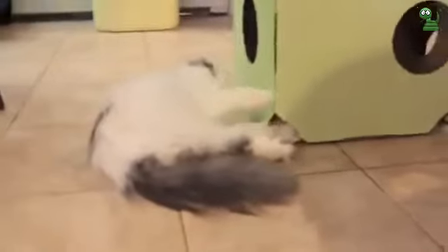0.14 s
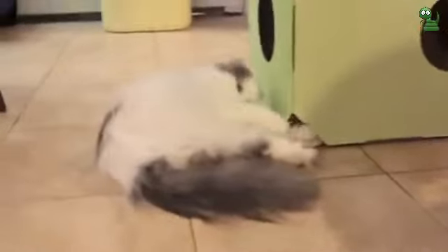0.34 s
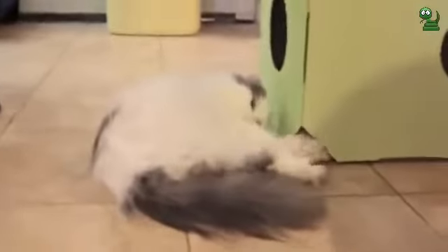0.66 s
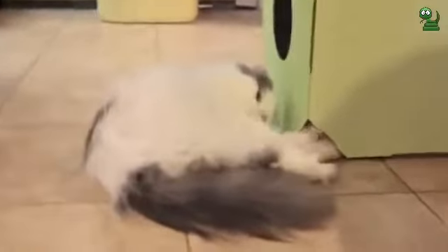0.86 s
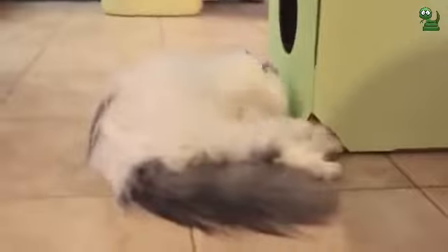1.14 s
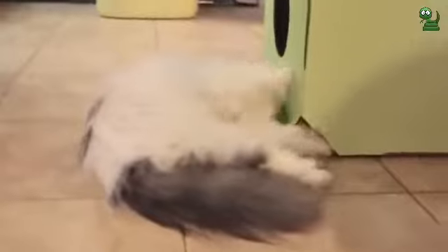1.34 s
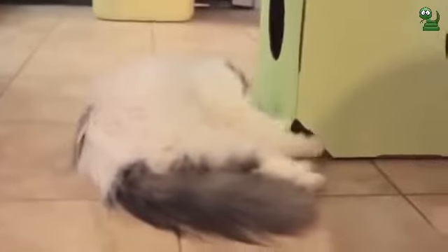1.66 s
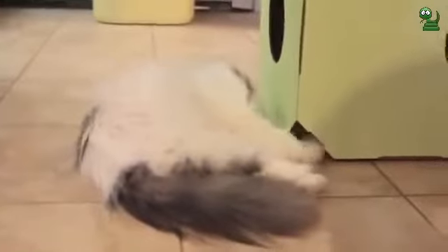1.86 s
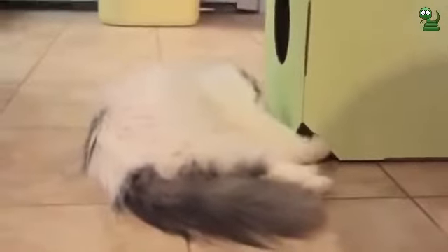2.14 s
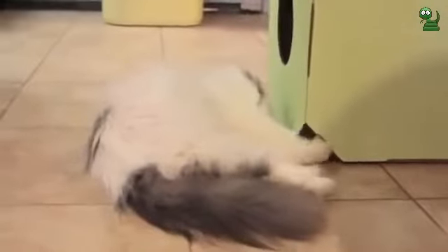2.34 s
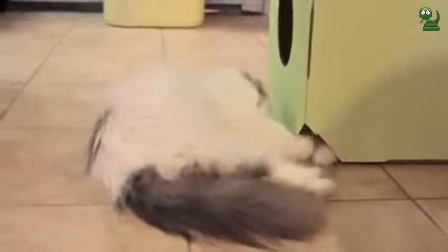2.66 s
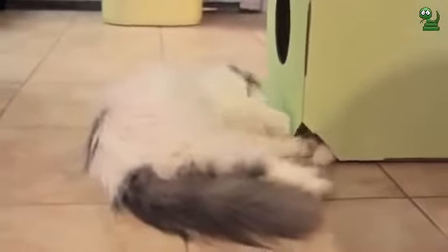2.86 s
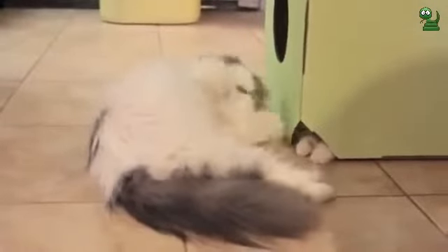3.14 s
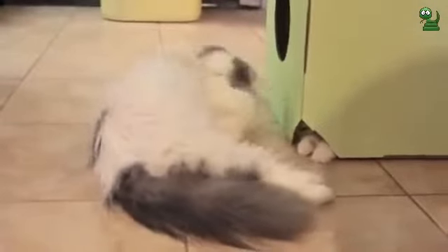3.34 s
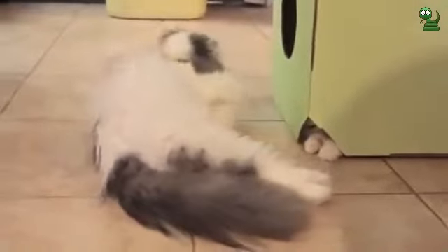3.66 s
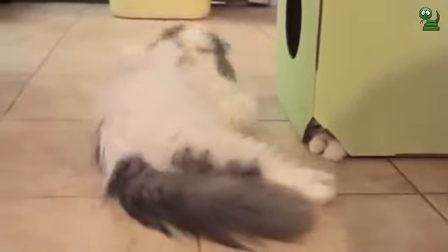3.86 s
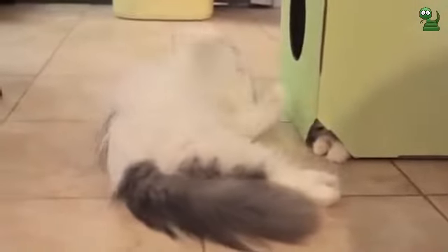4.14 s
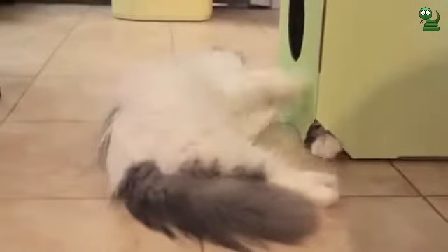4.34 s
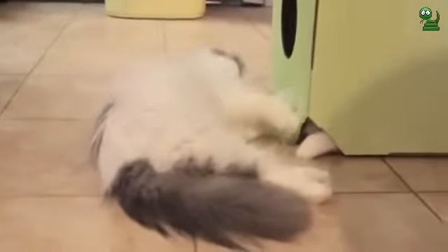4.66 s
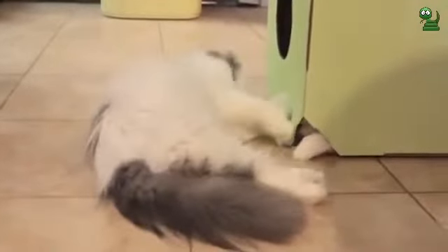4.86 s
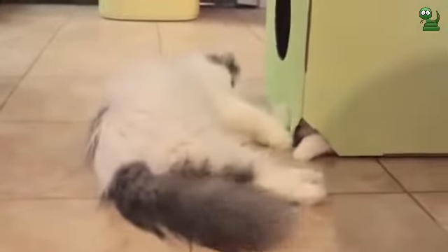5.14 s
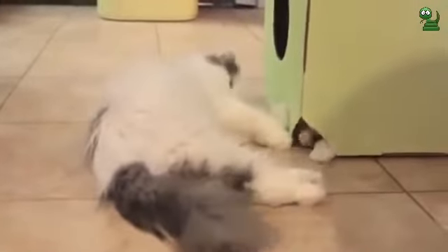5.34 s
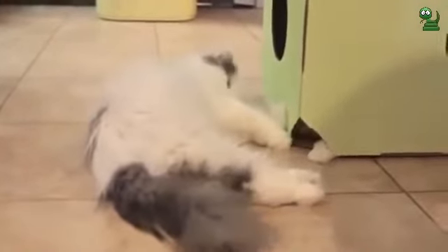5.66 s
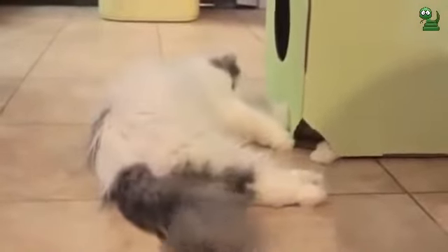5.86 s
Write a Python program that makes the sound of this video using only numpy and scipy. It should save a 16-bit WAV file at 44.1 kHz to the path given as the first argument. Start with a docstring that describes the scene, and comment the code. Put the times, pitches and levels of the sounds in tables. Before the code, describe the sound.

Irregular hollow thumps, brief scuffs and tiny clicks from a playing kitten in a small hard room, with one loud knock midway.

```python
"""A kitten paws at a hollow plastic pet house on a tile floor, a metre or two from a phone.
Blows ring damped wall modes; skids are random slips that scrape, shake the lower edge and hiss.
Claws tick as a snap and a short damped ring; fur and body rub as grainy filtered noise.
A small hard room answers with a noise tail, over appliance hum lines and steady room noise."""
import sys
import numpy as np
from scipy import signal
from scipy.fft import rfft, irfft
from scipy.io import wavfile
from scipy.ndimage import uniform_filter1d

SR = 44100
rng = np.random.default_rng(int(sys.argv[2]) if len(sys.argv) > 2 else 0)


def store_wav(level_fs):
    """Save 16-bit WAV to argv[1]."""
    pcm = np.round(np.clip(np.atleast_2d(level_fs), -1, 1) * 32767)
    wavfile.write(sys.argv[1], SR, pcm.T.astype(np.int16))


N = 264600


def undb(db):
    """Decibels to gain."""
    return 10 ** (np.asarray(db) / 20)


def level(x, db):
    """Scales to an rms level."""
    return x * undb(db) / np.sqrt(np.mean(x ** 2))


def band(x, hz, width_hz):
    """Two-pole resonance, gain 1 at the centre."""
    b, a = signal.iirpeak(min(hz, 0.4 * SR), hz / width_hz, fs=SR)
    return signal.lfilter(b, a, x)


def double_band(x, hz, width_hz):
    """Two resonances in series, the second twice as wide, for steeper skirts."""
    return band(band(x, hz, width_hz), hz, 2 * width_hz)


def add(out, start_s, piece):
    """Mixes a piece in at a time."""
    i = int(start_s * SR)
    out[i:i + len(piece)] += piece[:N - i]


def walk(rate_hz):
    """Random levels held 1 / rate_hz seconds and slewed twice; spread well under 1."""
    hold = int(SR / rate_hz)
    steps = np.repeat(rng.standard_normal(N // hold + 1), hold)
    return 0.91 * uniform_filter1d(uniform_filter1d(steps, hold), hold)[:N]


def fur():
    """Fine dense grains of hair catching, and a duller rub of the body, swelling as it moves."""
    # drag of fur over tile and plastic: time_s, hiss_db
    hair_levels = [(0.0, -59.5), (.08, -60), (.17, -67.5), (.33, -65), (.45, -55.5), (.62, -69.5),
                   (.75, -69.5), (1.0, -65), (1.3, -71.5), (1.62, -59.5), (1.85, -60.5), (2.1, -70),
                   (2.28, -65.5), (2.45, -67), (3.0, -65), (3.25, -72.5), (4.0, -68), (5.35, -70),
                   (5.52, -64), (5.7, -67), (6.0, -69)]
    # dull rub of the body: time_s, rub_db
    body_levels = [(0.0, -64.5), (.45, -56), (1.0, -61.5), (1.2, -64.5), (1.5, -53), (1.85, -66),
                   (3.3, -64), (3.5, -59), (3.7, -66), (6.0, -66)]
    hair_hz, hair_width_hz = 3980, 5800
    body_hz, body_width_hz = 1290, 1140
    t = np.arange(N) / SR
    grain_db = 1.5 * rng.exponential(size=N) + 0.3 * walk(20)
    hair, body = rng.standard_normal((2, N)) * undb(grain_db)
    hiss = level(band(hair, hair_hz, hair_width_hz), 0)
    rub = level(band(body, body_hz, body_width_hz), 0)
    hiss = hiss * undb(np.interp(t, *np.transpose(hair_levels)))
    return hiss + rub * undb(np.interp(t, *np.transpose(body_levels)))


def hum():
    """Each appliance line is partly a steady tone, partly narrow noise that makes it waver."""
    # hum lines: pitch_hz, width_hz, level_db
    lines = [(60.7, 12, -67), (102, 6, -78), (122.6, 9.8, -62), (195, 2.6, -50), (361.3, 1.2, -56),
             (393.7, 19, -59)]
    t, out = np.arange(N) / SR, 0
    for hz, width_hz, db in lines:
        noise = rng.standard_normal(N)
        waver = level(double_band(noise, hz, 2 * width_hz), 0)
        tone = np.sin(2 * np.pi * hz * t + rng.uniform(0, 2 * np.pi))
        out = out + level(tone + 0.2 * waver, db)
    return out


def room_noise():
    """Steady air and house noise with a fixed spectrum, swelling a little."""
    # relative spectrum: freq_hz, density_db (per Hz)
    spectrum = [(12, -44.5), (20, -23), (106, -4.5), (146, -11), (170, -1), (194, -6.5), (221, -1),
                (246, -11), (311, -2.5), (363, -5), (485, -11), (981, -14), (2650, -34), (8810, -56.5),
                (10300, -63), (13400, -66), (22000, -120)]
    rms_db, swell_db, swell_rate_hz = -52, 0.23, 0.7
    hz, db = np.transpose(spectrum)
    log_freq = np.log(np.fft.rfftfreq(N, 1 / SR) + 1)
    colour = undb(np.interp(log_freq, np.log(hz), db))
    noise = irfft(rfft(rng.standard_normal(N)) * colour, N)
    return level(noise, rms_db) * undb(swell_db * walk(swell_rate_hz))


def house(centre, aside):
    """The walls ring at their modes; every second mode is lopsided and needs a push off the centre."""
    # wall modes: pitch_hz, gain_db, t60_s
    modes = [(294, -5, 0.16), (345, -2.5, 0.19), (477.6, -10, 0.066), (576.4, -3.5, 0.11),
             (735.6, -14.5, 0.19), (820, -9.5, 0.097), (1097, -14, 0.1), (1104, -20.5, 0.019),
             (1200, -7, 0.068), (1344, -19.5, 0.17), (1520, -9, 0.055), (1757, -13.5, 0.15),
             (1854, -21, 0.081), (2335, -4.5, 0.065), (2700, -18, 0.033), (3530, -27, 0.036)]
    out = 0
    for k, (hz, db, t60_s) in enumerate(modes):
        pole = np.exp(2j * np.pi * hz / SR - np.log(1000) / (t60_s * SR))
        push = -aside if k % 2 else centre
        out = out + undb(db) * signal.lfilter([1], [1, -pole], push).imag
    return out


def skids():
    """House or paw on tile: dense uneven slips scrape, shake the thin lower edge; rubbing faces hiss."""
    # skids: start_s, length_ms, scrape_db (rms over the skid), scrape_hz, scrape_width_hz,
    # edge_db (rms over the skid), hiss_db (noise peak before its filter)
    strokes = [(0.456, 43, -45, 1480, 1900, -56, -51), (.52, 50, -51, 900, 985, -76, -78),
               (0.859, 240, -63, 1550, 600, -77, -61), (1.419, 68, -60.5, 3680, 2000, -81, -72),
               (1.54, 110, -52.5, 1330, 700, -56, -50), (1.59, 55, -59.5, 3870, 900, -66, -62),
               (1.697, 51, -51, 990, 1800, -46.5, -38), (2.717, 90, -51.5, 2160, 410, -48, -44),
               (3.104, 60, -51.5, 1200, 148, -59.5, -48), (3.2949, 19.6, -30, 1760, 2600, -38, -22.5),
               (3.743, 38, -63, 2260, 900, -86, -85), (4.065, 52, -52.5, 2340, 600, -77, -43.5),
               (4.088, 41, -53, 2800, 1290, -52.5, -47.5), (4.127, 190, -71, 2700, 900, -78, -79),
               (4.593, 34, -42, 1230, 190, -51.5, -48), (4.619, 14, -39, 1223, 190, -50, -48.5),
               (4.633, 19, -42, 1250, 190, -51, -49), (4.655, 35, -59, 1250, 260, -54.5, -66)]
    # resonances of the house's lower edge: pitch_hz, width_hz, relative_db
    edge_modes = [(1250, 62, 13.5), (1915, 340, 12), (2720, 300, 5), (4430, 1160, -5.5)]
    slips_per_s, to_walls_db = 2500, -37
    hiss_hz, hiss_width_hz = 2700, 7200
    ring, hiss, t = np.zeros(N), np.zeros(N), np.arange(SR // 4) / SR
    for s, ms, scrape_db, hz, width_hz, edge_db, hiss_db in strokes:
        progress = np.clip(t * 1000 / ms, 0, 1)
        stroke = np.sin(np.pi * progress ** 0.6) ** 0.62  # quick to start, slower to stop
        chance, size, noise = rng.random((3, len(t)))
        slips = stroke * (chance < slips_per_s / SR) * (2 * size - 1)
        scrape = double_band(slips, hz, width_hz)
        edge = sum(undb(g) * double_band(slips, f, w) for f, w, g in edge_modes)
        share = ms / 1000 * SR / len(t)  # makes the rms hold over the stroke, not the buffer
        add(ring, s, (level(scrape, scrape_db) + level(edge, edge_db)) * share ** 0.5)
        add(hiss, s, undb(hiss_db) * stroke * (2 * noise - 1))
    return undb(to_walls_db) * house(ring, ring) + ring + band(hiss, hiss_hz, hiss_width_hz)


def blows():
    """A half-sine push on the wall, duller when longer, and a short bright crack."""
    # blows: start_s, push_db (impulse area), contact_ms, off_centre (0-1),
    # crack_db (before decay and filter)
    hits = [(0.4578, -27.5, 0.68, 0.2, -63), (0.4611, -29, 0.6, 0.2, -58), (0.4687, -21, 0.45, 0.55, -67),
            (0.479, -25, 0.88, 0.33, -62), (0.4856, -25, 0.47, 0.16, -68), (1.699, -30.5, 0.65, 0.62, -35),
            (1.712, -38, 0.22, 0.6, -30), (3.2955, -13, 0.52, 0.67, -31), (3.3032, -24.5, 0.41, 0.74, -9),
            (3.31, -30, 0.92, 0, -47), (4.098, -40, 1.4, 0.36, -63)]
    crack_hz, crack_width_hz, crack_decay_ms = 4600, 3500, 0.5
    centre, aside, crack = np.zeros((3, N))
    t = np.arange(1024) / SR
    burst = np.sin(2 * np.pi * crack_hz * t) * np.exp(-t * 1000 / crack_decay_ms)
    for s, db, contact_ms, off_centre, crack_db in hits:
        shape = np.sin(np.pi * np.clip(t * 1000 / contact_ms, 0, 1))
        push = undb(db) * shape / shape.sum()
        add(centre, s, push)
        add(aside, s, off_centre * push)
        add(crack, s, undb(crack_db) * burst)
    return house(centre, aside) + double_band(crack, crack_hz, crack_width_hz)


def claws():
    """Each tick is a sharp snap and a few damped cycles."""
    # ticks: start_s, ring_db (before rise and decay), ring_hz, snap_db (peak), snap_top_hz
    ticks = [(1.37, -24, 366, -24, 9000), (1.925, -31, 900, -41, 3460), (2.46, -36, 1800, -37.5, 3800),
             (2.517, -36, 940, -46, 2000), (2.655, -41, 2080, -36.5, 5500), (4.035, -56, 5800, -43, 10000),
             (4.059, -36.5, 3420, -43, 9000), (4.093, -24, 2660, -30, 3750)]
    t60_ms, rise_ms = 14.7, 0.9
    snap_from = 0.22  # snap's low cut as a share of ring_hz
    out, t = np.zeros(N), np.arange(2048) / SR
    envelope = undb(-60000 * t / t60_ms) * (1 - np.exp(-t * 1000 / rise_ms))
    for s, db, hz, snap_db, top_hz in ticks:
        sos = signal.butter(5, [snap_from * hz, top_hz], "bandpass", fs=SR, output="sos")
        snap = signal.sosfilt(sos, t == 0)
        ring = np.sin(2 * np.pi * hz * t) * envelope
        add(out, s, undb(db) * ring + undb(snap_db) * snap / snap.max())
    return out


def walls(x):
    """A dense tail of room reflections that builds up in a few ms; the treble dies sooner."""
    low_t60_s, high_t60_s, split_hz, build_s = 0.35, 0.25, 6000, 0.0058
    t = np.arange(SR // 2) / SR
    noise = rng.standard_normal(len(t))
    low = signal.sosfilt(signal.butter(2, split_hz, fs=SR, output="sos"), noise)
    tail = low * undb(-60 * t / low_t60_s) + (noise - low) * undb(-60 * t / high_t60_s)
    tail = tail * (1 - np.exp(-(t / build_s) ** 2))
    return signal.fftconvolve(x, tail / np.sqrt(np.sum(tail ** 2)))[:N]


def scene():
    """The play, its echo in the room, and the background; the small ticks reach the walls more faintly."""
    wet_db, claw_send_db = -5.5, -4
    knocks, ticks = blows() + skids(), claws()
    echo = walls(knocks + undb(claw_send_db) * ticks)
    background = fur() + hum() + room_noise()
    return (knocks + ticks + undb(wet_db) * echo + background)[None]


def record(dry):
    """The phone cuts the top with a steep low-pass."""
    top_hz = 10450
    return signal.sosfilt(signal.ellip(12, 0.2, 75, top_hz, fs=SR, output="sos"), dry)


dry = scene()
out = record(dry)
store_wav(out)
```